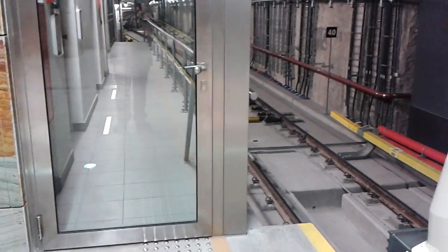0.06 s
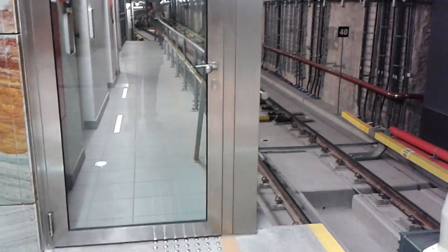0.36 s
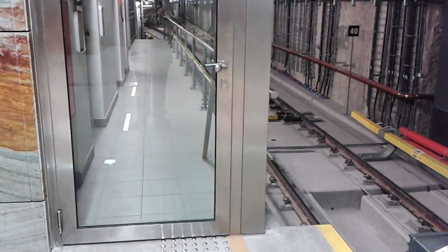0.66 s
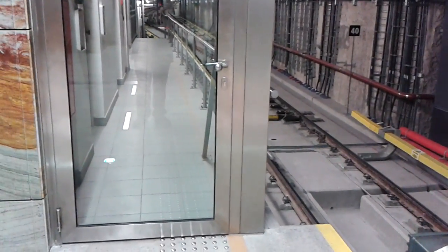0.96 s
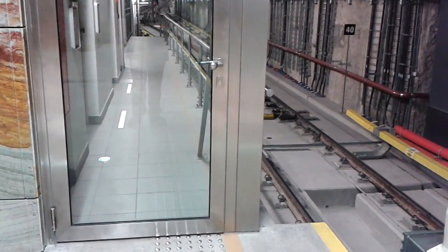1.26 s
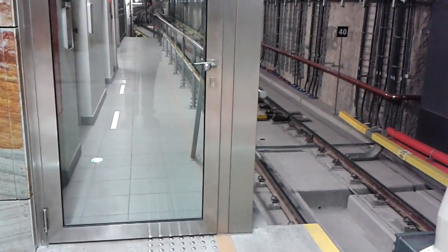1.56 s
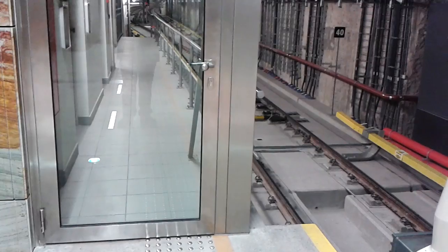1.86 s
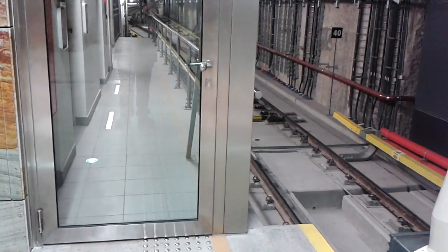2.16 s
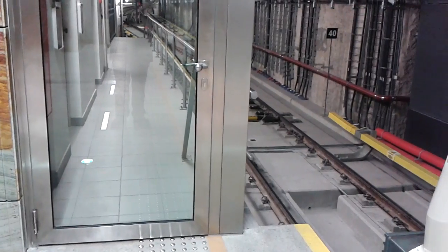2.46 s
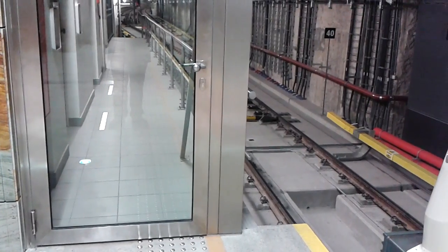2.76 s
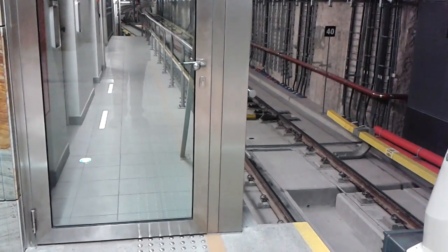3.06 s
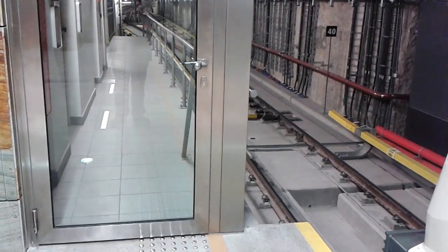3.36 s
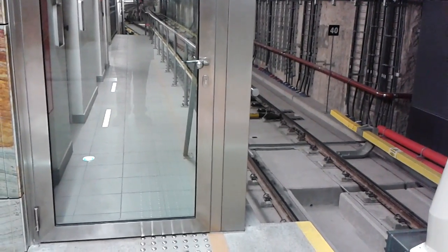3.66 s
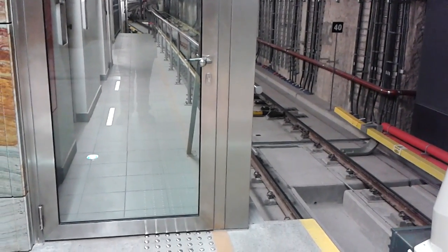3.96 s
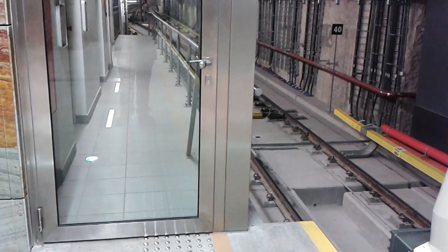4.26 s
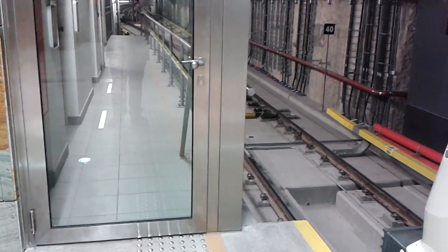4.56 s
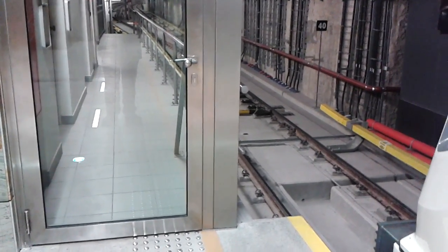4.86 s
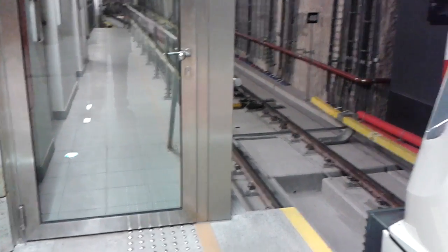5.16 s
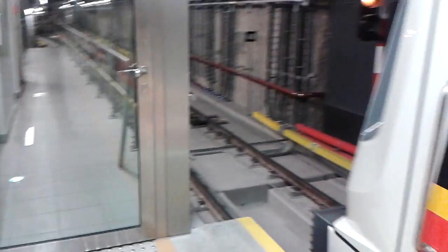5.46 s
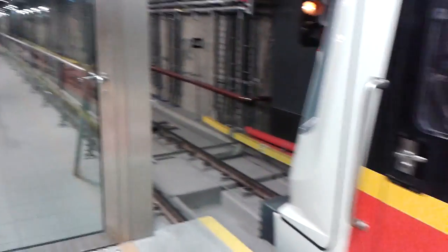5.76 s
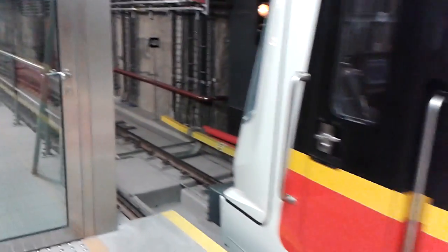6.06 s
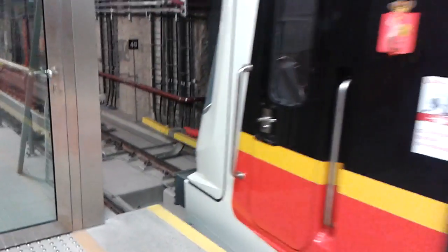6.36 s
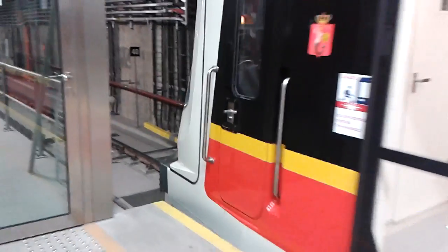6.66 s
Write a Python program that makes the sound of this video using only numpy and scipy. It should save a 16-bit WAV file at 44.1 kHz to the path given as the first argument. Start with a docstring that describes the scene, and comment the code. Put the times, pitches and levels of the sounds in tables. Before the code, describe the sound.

A metro train idles at an underground platform with a low rumble, a wavering machinery hum and rushing fans. A faint, high air leak swells gently around 0.9, 1.3 and 2.3 seconds. At about 3.9 seconds the brakes release with a sudden loud hiss, carrying a breathy whistle that scoops up, then sinks and fades by about 5.5 seconds. An electric whine of several steady tones starts with the hiss, growing louder and more shimmering as the train moves off from about 5.1 seconds. Between 5.3 and 6.3 seconds the dragging brakes give a cluster of short, high, rasping squeals, loudest near 5.6, with a lower one near 5.9 and a fainter one around 6.8. Underneath, a low wheel rumble builds, with a soft thud just after 6 seconds. The whistle and squeals reverberate briefly in the concrete tunnel.

```python
"""A low rumble and hum of fans and machinery: a metro train stands at an underground platform, then leaves.
Brake air blows off in a turbulent hiss whose whistle sinks as the pressure drops. The dragging brakes
squeal by stick-slip friction, and whistle and squeals reverberate in the tunnel. The traction inverter
sings on multiples of its switching rate, which split into sidebands as the motors gather speed,
while the rolling wheels shake the track slab."""
import sys
import numpy as np
from scipy import signal
from scipy.fft import rfft, irfft
from scipy.io import wavfile
from scipy.ndimage import uniform_filter1d, map_coordinates

SR = 44100
rng = np.random.default_rng(int(sys.argv[2]) if len(sys.argv) > 2 else 0)


def inscribe(sig):
    """Save sig as 16-bit PCM at rate SR to the path in sys.argv[1].

    A 1-D sig is mono; a 2-D sig holds one channel per row.
    Samples are clipped to [-1, 1] before scaling.
    """
    pcm = np.round(np.clip(np.atleast_2d(sig).T, -1, 1) * 32767)
    wavfile.write(sys.argv[1], SR, pcm.astype(np.int16))


N = 304330
T = np.arange(N) / SR
FREQS = np.maximum(np.arange(N // 2 + 1) * SR / N, 1)

# surges of the brake leak and the fan air: peak_s, half_length_s, leak_db, fan_db
AIR_SURGES = [(.06, .08, .7, 2.5), (.88, 0.35, 4.5, 2.5), (1.347, 0.31, 3.5, 2.5), (1.35, .05, 1, 0),
              (2.334, 0.14, 4, 2.5), (2.36, 0.033, 5.5, 0.5)]

RELEASE_S, ONSET_S = 3.885, 0.096  # the brake valve opens and the drive switches on; their rise time
SINCE_RELEASE_S = np.maximum(T - RELEASE_S, 0)
DEPART_S, CREEP_HZ, ACCELERATION_HZ_PER_S = 5.1, 0.5, 3.6
FIELD_HZ = CREEP_HZ + ACCELERATION_HZ_PER_S * np.maximum(T - DEPART_S, 0)  # the motors' rotating field


def brake_air(leak_db=-44.5, nozzle_db=-21.5, jet_db=-30, jet_build_s=0.1, flutter_db=0.5):
    """Turbulent jet noise: gear leaks, then a valve vents with a whistle that sinks with the pressure."""
    # spectra of the leak, the nozzle hiss and the broad jet behind it: frequency_hz, level_db
    leak_spectrum = [(3000, -40), (5000, -12), (5800, -4.5), (6500, 1.5), (7200, -2), (7900, -11),
                     (8700, -17), (9500, -67)]
    nozzle_spectrum = [(3500, -15.5), (4600, -15), (5050, -13), (5500, -8), (5950, -3.5), (6500, 1),
                       (7200, 1.5), (7900, -5.5), (8700, -9), (9900, -19.5), (11500, -16), (12500, -36)]
    jet_spectrum = [(400, -5), (850, 8.5), (1300, 2.5), (1800, 4.5), (2400, -1.5), (3400, 5.5), (4750, -2),
                    (5250, 0), (6000, 3.5), (10000, -42)]
    # the breathy whistle scoops up, then narrows and sinks: time_s, pitch_hz, width_hz, level_db
    whistle_path = [(3.939, 6550, 1303, -24), (4.061, 7410, 1605, -22.5), (4.241, 7450, 1306, -23),
                    (4.38, 7110, 794, -20), (4.53, 6920, 698, -22), (4.629, 6500, 952, -27),
                    (4.8, 6310, 894, -20.5), (5.0, 5860, 800, -31.5), (5.2, 5450, 660, -34.5),
                    (5.599, 4900, 646, -51)]
    surge_db = sum(db * bump(peak_s, half_s) for peak_s, half_s, db, _ in AIR_SURGES)
    leak = noise(colour(leak_spectrum)) * undb(leak_db + surge_db)
    valve_open = np.sin(np.pi / 2 * np.minimum(SINCE_RELEASE_S / ONSET_S, 1)) ** 2
    emptying_db = 3 * SINCE_RELEASE_S ** 1.7  # the hiss dies ever faster as the cylinders empty
    nozzle = noise(colour(nozzle_spectrum)) * undb(nozzle_db - emptying_db)
    jet_build = 1 - np.exp(-SINCE_RELEASE_S / jet_build_s)
    jet = noise(colour(jet_spectrum)) * undb(jet_db - 3 * SINCE_RELEASE_S) * jet_build
    times, *controls = np.transpose(whistle_path)
    pitch_hz, width_hz, level_db = (np.interp(T, times, control) for control in controls)
    eddies = unit(np.real(random_phasor(width_hz) * np.exp(1j * running_phase(pitch_hz))))
    whistle = tunnel(valve_open * eddies * undb(level_db), wet_db=2, low_t60_s=0.37, high_t60_s=0.24)
    return leak + undb(flutter_db * fluctuation(16)) * (valve_open * (nozzle + jet) + whistle)


def brake_squeals(rise_share=0.36, edge_db=24, slip_hz=150, waver=0.0077, rasp_db=4):
    """Stick-slip friction excites disc modes, which sink as the grip eases; uneven slip makes them rasp."""
    # squeals of the pads: peak_s, length_s, pitch_hz, level_db, roughness, sink_hz_per_s
    squeals = [(5.336, 0.51, 1534, -36.5, 0.57, 278.4), (5.44, 0.41, 2770, -27, 0.6, 598),
               (5.509, 0.21, 2530, -36, 0.4, 99), (5.573, 0.28, 2759, -16, 0.26, 50),
               (5.724, .15, 2765, -27, 0.36, 50), (5.846, 0.27, 2940, -35, 0.75, 400),
               (5.865, .12, 2750, -32.5, .4, 30), (5.857, 0.37, 1487, -22.5, 0.33, 25),
               (5.96, 0.18, 1482, -34, 0.39, 25), (5.926, 0.54, 3890, -40, 1.2, 102),
               (5.946, .23, 2734, -24.5, 0.43, 30), (6.092, 0.55, 2730, -30, 0.83, 39.7),
               (6.1, .25, 3140, -38, 0.73, 201), (6.778, 0.52, 2720, -35, 0.8, 49.7)]
    out = np.zeros(N)
    for peak_s, length_s, pitch_hz, level_db, roughness, sink_hz_per_s in squeals:
        start_s = peak_s - rise_share * length_s
        end_s = start_s + length_s
        live = slice(int((start_s - .1) * SR), min(int((end_s + .2) * SR), N))
        t = T[live]
        slips = np.arange(len(t)) * slip_hz / SR  # pitch and loudness take new values at every slip
        wobble, shake = (map_coordinates(row, [slips], order=3) for row in rng.standard_normal((2, 400)))
        hz = (pitch_hz - sink_hz_per_s * (t - peak_s)) * (1 + roughness * waver * wobble)
        from_peak = np.maximum((peak_s - t) / (peak_s - start_s), (t - peak_s) / (end_s - peak_s))
        swell = undb(level_db - edge_db * from_peak ** 1.25 + roughness * rasp_db * shake)
        out[live] += np.sqrt(2) * swell * np.sin(running_phase(hz))
    return tunnel(out, wet_db=-14, low_t60_s=0.8, high_t60_s=1.0)


def inverter(switch_hz=550.2, split_limit=0.79, rattle=0.0091):
    """Forced vibration: switching harmonics drive the motors; the turning field modulates each of them."""
    # harmonics of the switching rate: multiple, relative_db, reach (in sideband orders)
    harmonics = [(2, -1.5, 1.3), (4, 1, 0.8), (5, -3.5, 3), (6, 5.5, 3.8), (7, -7, 3), (8, 0.8, 3.6),
                 (10, 1.5, 4), (12, 8.5, 4.6), (13, -4, 4), (14, -2, 3.6), (16, -15.5, 4), (18, -34, 4),
                 (20, -37, 4)]
    # brief swells and dips of single harmonics: peak_s, half_length_s, multiple, change_db
    flares = [(4.006, 0.064, 6, 12), (4.0, 0.15, 2, 11), (5.083, 0.13, 14, 17), (5.188, 0.083, 10, 8),
              (5.24, 0.13, 6, 8.5), (5.61, 0.061, 6, 4), (5.757, 0.089, 2, 7), (5.522, 0.018, 10, 5),
              (5.776, 0.05, 10, 12), (5.914, 0.046, 10, 5), (5.982, 0.03, 6, 0), (6.062, 0.062, 2, 15.5),
              (6.035, 0.032, 14, 13), (6.142, .03, 14, 7), (6.39, .06, 14, 7), (6.123, 0.045, 6, -7),
              (6.126, .06, 12, 5.5), (6.17, .035, 8, -11), (6.255, 0.028, 8, 5.5), (6.36, .035, 8, 3),
              (6.51, 0.045, 8, 6), (6.174, 0.064, 4, 6), (6.2, 0.095, 2, -6.5), (6.297, 0.026, 4, -15),
              (6.315, 0.06, 12, 5), (6.386, 0.039, 6, 8), (6.432, 0.16, 4, 5.5), (6.58, 0.11, 2, 3.5),
              (6.76, 0.036, 6, 7.5), (6.827, 0.018, 2, 5)]
    lowest_db = -53 + 7.5 * SINCE_RELEASE_S
    middle_db = -53.5 + 6 * SINCE_RELEASE_S
    high_db = -49 + 3.5 * SINCE_RELEASE_S
    pace = FIELD_HZ / FIELD_HZ.max()
    field_phase = running_phase(FIELD_HZ)
    grain = fluctuation(63) + 1j * fluctuation(60)
    out = np.zeros(N)
    for multiple, relative_db, reach in harmonics:
        drive_db = lowest_db if multiple == 2 else middle_db if multiple < 10 else high_db
        flare_db = sum(db * bump(at_s, half_s) for at_s, half_s, which, db in flares if which == multiple)
        # with speed, power moves from the carrier into its sidebands, soonest in the wide groups
        share = split_limit * (1 - np.exp(-pace * reach ** 2 / 2))
        cluster = np.sqrt(1 - share) + np.sqrt(share) * sidebands(field_phase, reach)
        carrier = np.exp(2j * np.pi * multiple * switch_hz * T)
        tone = np.real(cluster * (1 + rattle * multiple * grain) * carrier)
        emergence = pace if multiple % 2 else 1  # odd harmonics grow with speed
        out += np.sqrt(2) * tone * emergence * undb(relative_db + drive_db + flare_db)
    return out * np.minimum(SINCE_RELEASE_S / ONSET_S, 1)


def sidebands(field_phase, reach, drift=0.71):
    """Modulation puts lines either side of a carrier, spaced by the field rate; their phases drift."""
    coarse = slice(None, None, 64)
    orders = np.r_[-7:0, 1:8][:, None]
    weights = np.exp(-(orders / reach) ** 2 / 2)
    angle = field_phase[coarse]
    steps = rng.standard_normal((len(orders), len(angle))) * np.sqrt(np.gradient(angle) / (2 * np.pi))
    wander = uniform_filter1d(np.cumsum(steps, axis=1), size=60)
    phases = orders * angle + 2 * np.pi * rng.random(orders.shape) + drift * wander
    lines = np.sum(weights * np.exp(1j * phases), axis=0)
    return np.interp(T, T[coarse], lines) / np.linalg.norm(weights)


def rolling(level_db=-23, build_s=1.22, thud_db=7.5):
    """Resonance: the wheels begin to roll and excite the modes of the track slab; one wheel thuds."""
    # modes of the track slab: centre_hz, width_hz, level_db
    slab_modes = [(152, 27, -3), (269, 55, -4), (351, 19, -11.5)]
    slab = sum(undb(db) * resonance(hz, width_hz) for hz, width_hz, db in slab_modes)
    under_way = 1 - np.exp(-np.maximum(T - DEPART_S, 0) / build_s)
    return noise(slab) * under_way * undb(level_db + thud_db * bump(peak_s=6.15, half_s=0.066))


def machinery(idle_db=-23.5, fan_db=-36.5, crossover_hz=850, flutter_db=0.42):
    """Turbulence and duct resonance: fan air rushes and surges; rumble and hum fade with distance."""
    # spectrum of the fans and machinery: frequency_hz, level_db
    fan_spectrum = [(15, -58.5), (25, -29.5), (39, -27.5), (81, -11), (125, -6), (146, -5.5), (192, -2.5),
                    (245, -1.5), (305, -2.1), (366, -7.5), (488, -8.5), (582, -11.5), (636, -13.5),
                    (812, -18), (2010, -24), (3670, -30.5), (4400, -35.5), (5000, -40.3), (6500, -60),
                    (11000, -120)]
    # narrow bands of machinery hum: centre_hz, width_hz, relative_db
    hum_bands = [(52.7, 7, -24.5), (128.5, 5, -13), (160.7, 6, -10.5), (273, 6, -21), (296, 7.1, -12.5),
                 (620, 21, -17.5)]
    low_share = 1 / (1 + (FREQS / crossover_hz) ** 8)
    departure = (FIELD_HZ - CREEP_HZ) / FIELD_HZ.max()
    receding_db = idle_db - 5.5 * departure
    rush_db = fan_db + 1.0 * departure
    surge_db = sum(db * bump(peak_s, half_s) for peak_s, half_s, _, db in AIR_SURGES)
    rumble = noise(colour(fan_spectrum) * np.sqrt(low_share))
    rumble *= undb(receding_db - 1.8 + 0.57 * surge_db + flutter_db * fluctuation(9.3))
    rush = noise(colour(fan_spectrum) * np.sqrt(1 - low_share))
    rush *= undb(rush_db + surge_db + flutter_db * fluctuation(20))
    hum = sum(undb(db) * noise(resonance(hz, width_hz)) for hz, width_hz, db in hum_bands)
    return rumble + rush + hum * undb(receding_db)


def hum_swells(wander_hz=14):
    """Amplitude and phase modulation: the hum swells near its main notes, wandering a little in pitch."""
    # swells of the hum: peak_s, half_length_s, pitch_hz, level_db
    swells = [(0.174, 0.053, 157, -22), (0.754, 0.17, 159.2, -27), (0.757, .16, 286, -28.5),
              (1.16, 0.054, 292, -34), (1.376, 0.088, 255, -33), (1.693, 0.039, 271.7, -24.5),
              (2.02, 0.06, 158, -26), (2.104, .05, 272, -29), (2.34, .08, 156.4, -31.5),
              (2.811, 0.028, 275.7, -23.5), (2.903, .1, 157.6, -29), (2.94, 0.033, 291, -21),
              (3.346, 0.046, 272.3, -23.5), (3.544, 0.076, 160, -30), (3.87, 0.092, 276, -30.5),
              (3.915, 0.068, 158, -35), (4.298, 0.204, 158.8, -32.5), (5.15, .09, 160.4, -31),
              (6.721, 0.096, 156.7, -26.5)]
    out = np.zeros(N)
    for peak_s, half_s, pitch_hz, level_db in swells:
        live = slice(max(int((peak_s - 3 * half_s) * SR), 0), int((peak_s + 3 * half_s) * SR))
        t = T[live]
        note = np.real(random_phasor(np.full(len(t), wander_hz)) * np.exp(2j * np.pi * pitch_hz * t))
        out[live] += np.sqrt(2) * note * undb(level_db) * bump(peak_s, half_s)[live]
    return out


def tunnel(direct, wet_db, low_t60_s, high_t60_s, crossover_hz=3500):
    """Reverberation: dense reflections off the concrete follow the direct sound, decaying in two bands."""
    t = T[:SR]
    scatter = rng.standard_normal(SR)
    low = signal.sosfilt(signal.butter(2, crossover_hz, fs=SR, output="sos"), scatter)
    tail = low * undb(-60 * t / low_t60_s) + (scatter - low) * undb(-60 * t / high_t60_s)
    tail *= t > .006  # delay of the first reflection
    wet = signal.fftconvolve(direct, tail / np.linalg.norm(tail))[:N]
    return (direct + undb(wet_db) * wet) / np.sqrt(1 + undb(2 * wet_db))


def undb(db):
    """Decibels to amplitude ratio."""
    return 10 ** (np.asarray(db) / 20)


def unit(x):
    """Normalisation to rms 1."""
    return x / np.sqrt(np.mean(x ** 2))


def noise(gain):
    """White noise filtered by the given gain at each frequency, rms 1."""
    return unit(irfft(rfft(rng.standard_normal(N)) * gain, N))


def colour(points):
    """Spectral envelope: gain at each frequency from (frequency_hz, level_db) points."""
    hz, db = np.transpose(points)
    return undb(np.interp(np.log(FREQS), np.log(hz), db))


def resonance(hz, width_hz):
    """Lorentzian peak: the gain halves width_hz either side of the centre."""
    return 1 / (1 + ((FREQS - hz) / width_hz) ** 2)


def fluctuation(cutoff_hz):
    """Low-pass noise for slow random modulation, rms 1."""
    return noise(1 / (1 + (FREQS / cutoff_hz) ** 4))


def random_phasor(rate_hz):
    """Random modulation: a phasor glides to a new angle rate_hz times a second, broadening a tone."""
    steps = np.cumsum(rate_hz) / SR
    phasors = np.exp(2j * np.pi * rng.random(N // 8))
    return map_coordinates(phasors, [steps], order=3, mode="mirror")


def running_phase(hz):
    """Phase in radians as the time integral of frequency."""
    return 2 * np.pi * np.cumsum(hz) / SR


def bump(peak_s, half_s):
    """Gaussian envelope: 1 at its peak, 1/e half_s either side."""
    return np.exp(-((T - peak_s) / half_s) ** 2)


def scene():
    """Superposition of all the sources at the platform, in one channel."""
    return (machinery() + hum_swells() + brake_air() + brake_squeals() + inverter() + rolling())[None]


def record(dry, bottom_hz=42, top_hz=11850):
    """Band limiting: the microphone sheds the deepest bass and the top is cut."""
    thin = signal.sosfilt(signal.butter(6, bottom_hz, "high", fs=SR, output="sos"), dry)
    return signal.sosfilt(signal.ellip(10, .2, 80, top_hz, fs=SR, output="sos"), thin)


dry = scene()
out = record(dry)
inscribe(out)
```